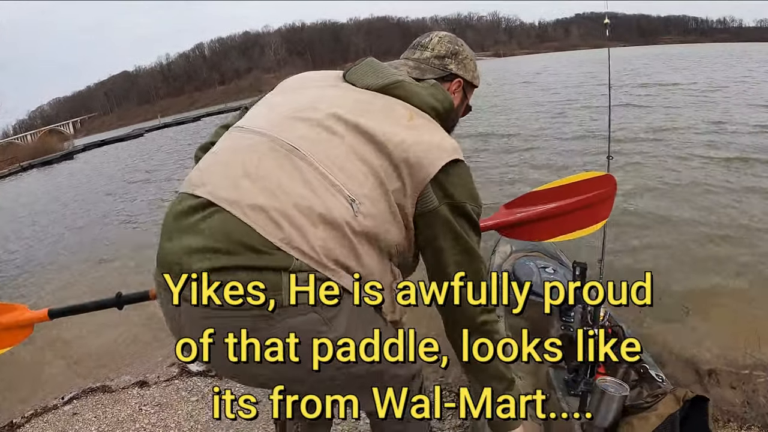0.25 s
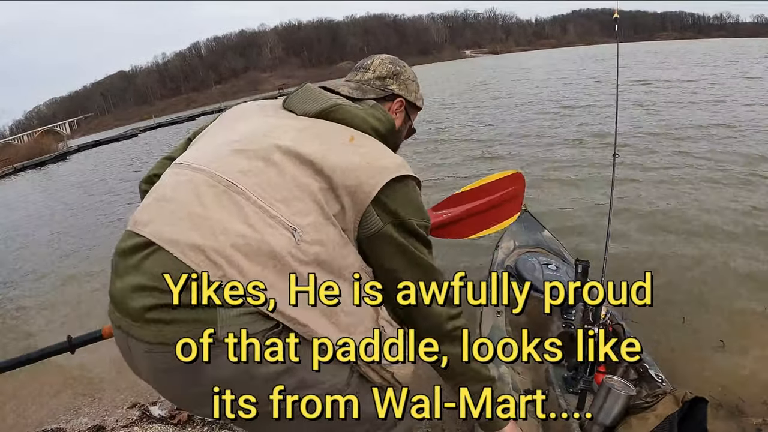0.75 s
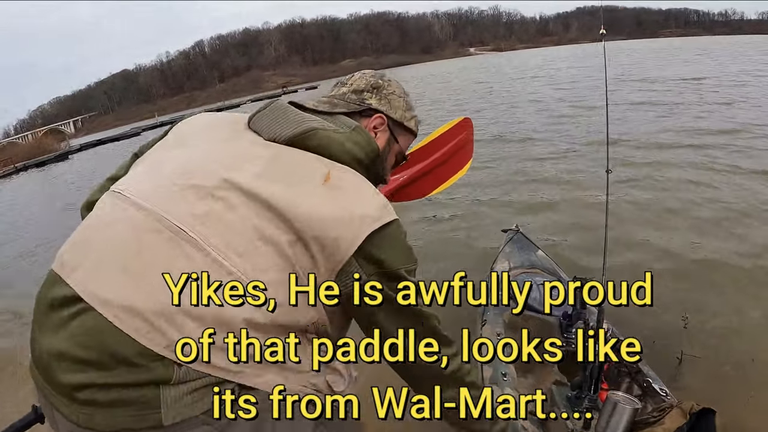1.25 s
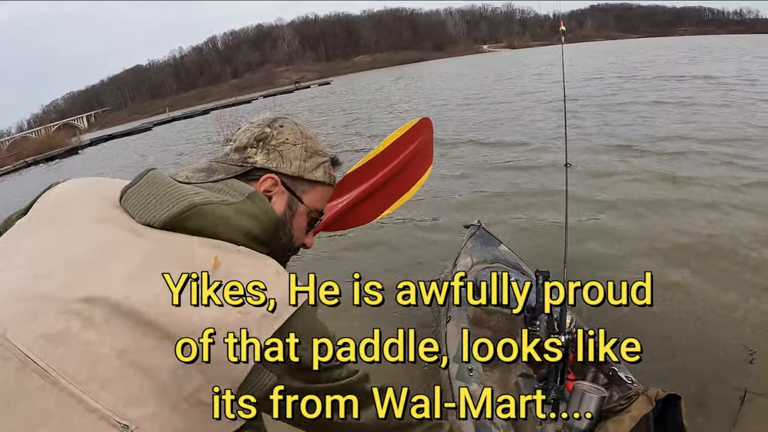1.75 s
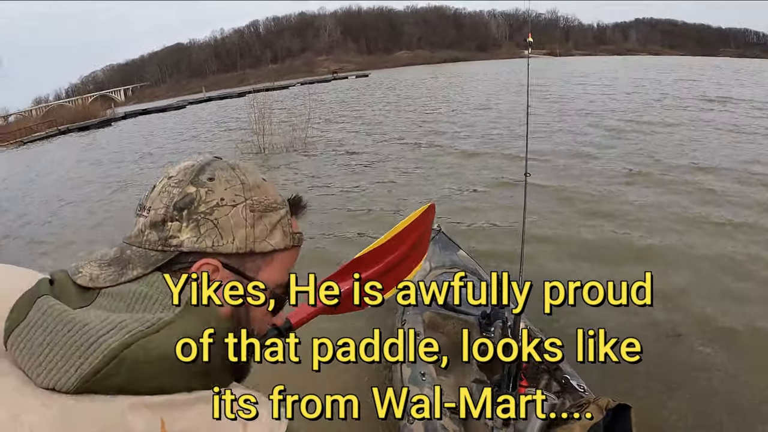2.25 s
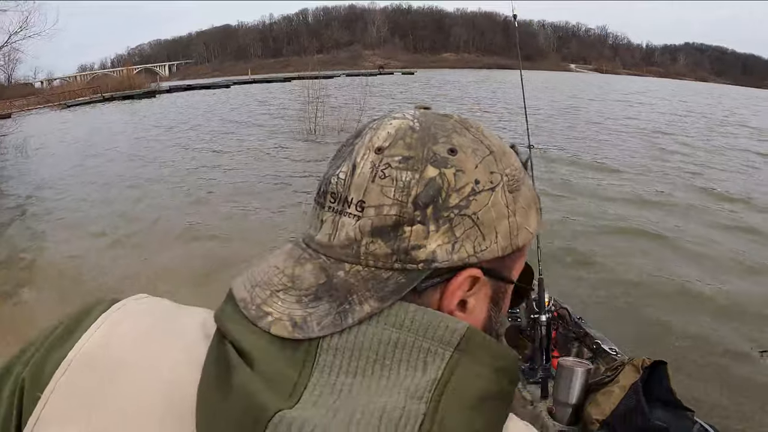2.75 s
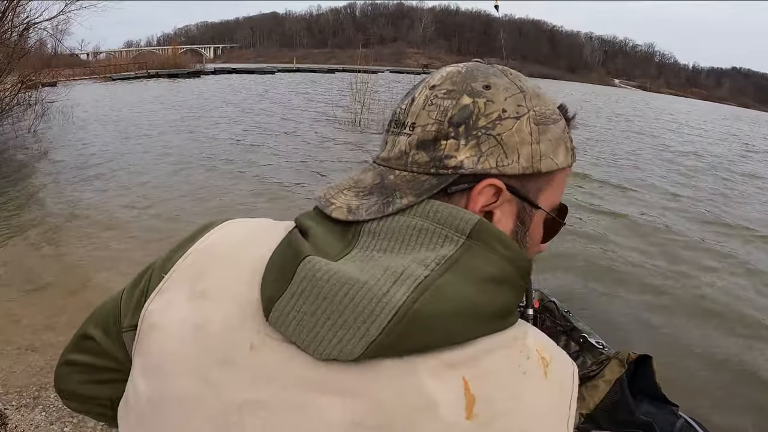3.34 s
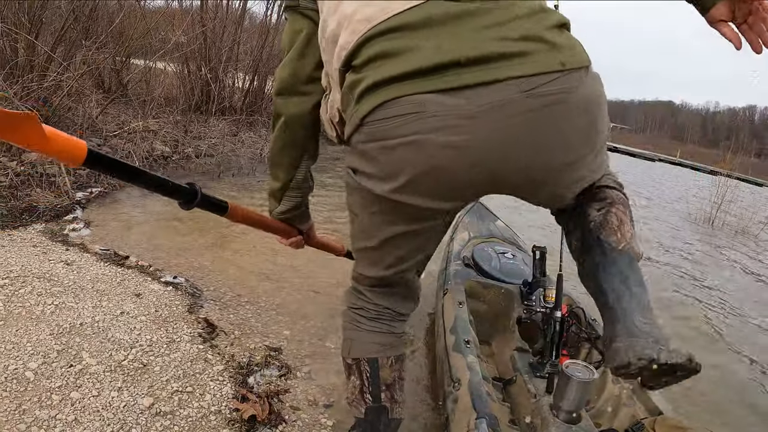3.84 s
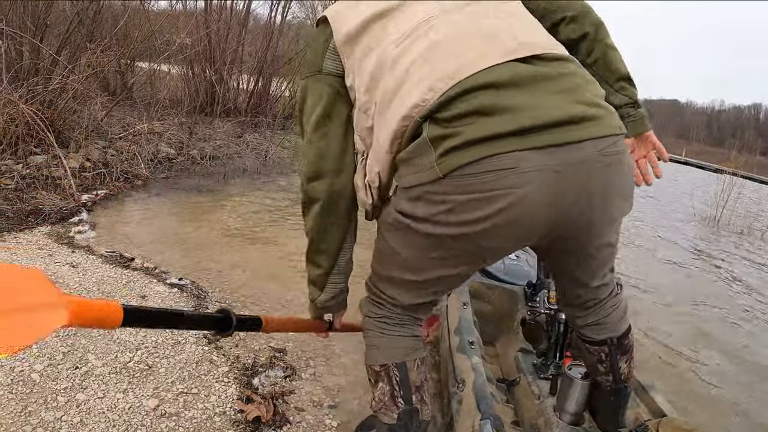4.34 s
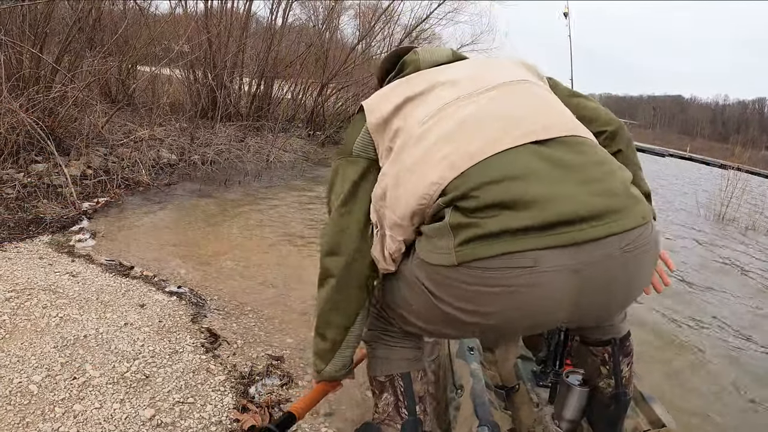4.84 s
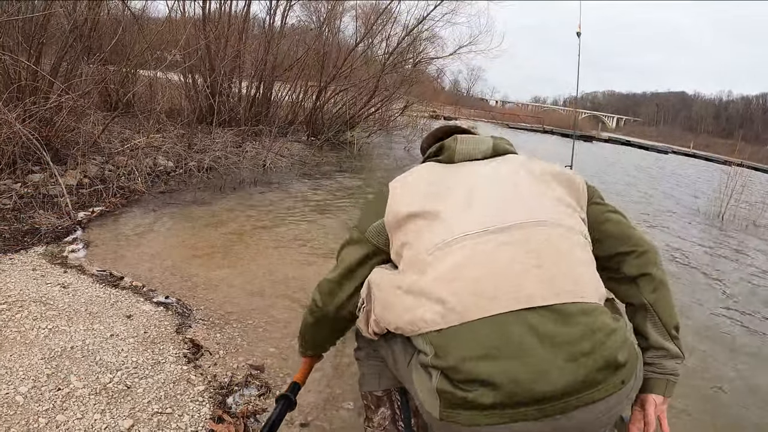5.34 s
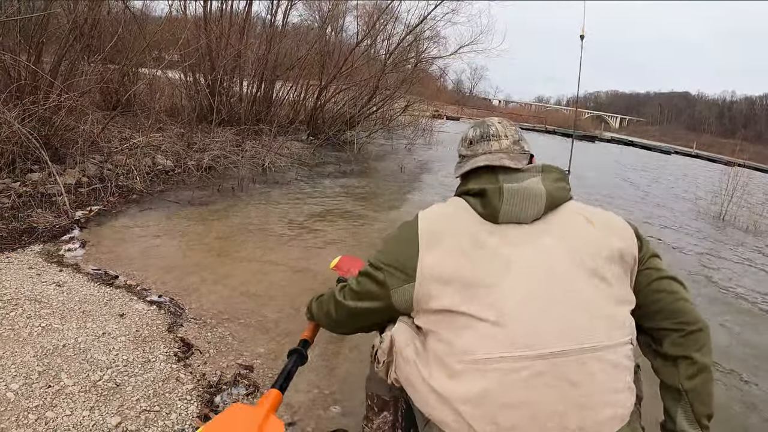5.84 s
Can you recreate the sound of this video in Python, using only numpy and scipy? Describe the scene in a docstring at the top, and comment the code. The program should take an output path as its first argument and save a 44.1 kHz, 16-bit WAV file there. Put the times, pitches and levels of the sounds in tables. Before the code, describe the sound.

At a quiet lakeshore, heard close up, a hollow plastic kayak is shoved over gravel in booming, scratchy lurches that weaken as it floats, with loose gear ticking. The level cuts out for an instant, then boots slosh and plop in shallow water, hull and deck are knocked, and the boat hisses away over wet sand. Light wind and a faint far engine sit underneath.

```python
"""On a lake shore, a plastic kayak grinds over gravel into the water: random stone hits shake its hollow,
booming hull, scratch and crackle, while loose gear clicks as short rings. The level drops out briefly.
Then boots slosh (filtered noise and ringing bubbles) and hull and deck are knocked (fading tones) as the
paddler boards, and the boat slides off over hissing wet sand. Light wind is low noise that swells in gusts;
from the wading on, a far engine hums as a wavering tone with two overtones."""
import sys
import numpy as np
from scipy import signal
from scipy.fft import rfft, irfft, next_fast_len
from scipy.io import wavfile
from scipy.ndimage import map_coordinates

SR = 44100
rng = np.random.default_rng(int(sys.argv[2]) if len(sys.argv) > 2 else 0)


def wav_out(sig):
    """Save sig, one row per channel (or a flat mono array), as 16-bit PCM at SR to the path in sys.argv[1]."""
    wavfile.write(sys.argv[1], SR, np.round(np.clip(np.atleast_2d(sig).T, -1, 1) * 32767).astype(np.int16))


N = 268657  # length of the scene in samples

# All levels are relative. A t60 is the time a ring takes to fade by 60 dB.
# A half length is the time from the peak of a swell until it has fallen to about a third.

# Steady grinding of the hull on gravel, easing as the boat floats: (time [s], level [dB])
DRAG_LEVEL = [(0.0, -28.5), (0.45, -32.5), (1.12, -30.8), (1.17, -33.5), (1.32, -37), (1.44, -36.5),
              (1.68, -27), (1.92, -32.5), (2.13, -35), (2.24, -41), (2.52, -44.5), (2.8, -45),
              (3.15, -47.5), (3.42, -60)]
# Lurches forward over the stones: (peak time [s], grinding level [dB], boom level [dB], half length [s])
LURCHES = [(0.005, -21.5, -13.5, 0.019), (0.167, -29.5, -26.5, 0.085), (0.278, -30.5, -21, 0.052),
           (0.382, -31.5, -24, 0.025), (0.526, -27.5, -22.5, 0.04), (0.765, -35, -27, 0.095),
           (0.967, -50, -28, 0.032), (1.377, -32.5, -30, 0.021), (1.574, -25.5, -33, 0.12),
           (2.046, -37, -25, 0.035), (2.324, -41.5, -33.5, 0.058), (2.618, -39.5, -31, 0.08),
           (2.758, -34, -30, 0.063), (3.216, -44, -34, 0.087)]
# Tone of stones heard through the shell: (frequency [Hz], level [dB])
SHELL_TONE = [(60, -30), (120, 3), (215, 1), (290, -4), (420, -2), (540, -6), (610, -4.5), (800, -10.5),
              (1100, -13.5), (1400, -16), (2000, -27), (4000, -52), (15500, -83)]
# Air and panel resonances, hull on the stones: (frequency [Hz], width [Hz], level [dB])
HULL_ON_STONES = [(84.4, 20, 2), (136.7, 35.6, 4), (161, 31, -3.5), (210.3, 41, -2)]
# The same with the bow in the water: (frequency [Hz], width [Hz], level [dB])
HULL_AFLOAT = [(113, 11.8, 4), (173, 47, -6.5), (211, 28, -8)]
# Tone of stone edges scratching the plastic: (frequency [Hz], level [dB])
SCRATCH_TONE = [(300, -22), (900, -8.5), (1230, 6), (1520, 2.5), (1670, 7.5), (1900, 2), (3000, -6.5),
                (4200, -15.5), (6000, -34), (9000, -31), (15500, -59)]
# Tone of stones heard directly: (frequency [Hz], level [dB])
GRIT_TONE = [(800, -7), (2500, 6.5), (4000, 3.5), (6000, 0.5), (7800, -2), (9200, -11), (11000, -18.5),
             (13000, -17), (15500, -37.5)]
# Light wind: (frequency [Hz], level [dB])
WIND_TONE = [(12, -8.5), (28, 0.5), (55, 2.5), (100, -5), (200, -13.5), (500, -35.5), (2000, -67.5),
             (12000, -80)]
# Gusts: (peak time [s], level [dB])
GUSTS = [(0.12, -51), (0.78, -49), (1.42, -41), (2.0, -42), (3.221, -35.5), (4.38, -27.5), (4.62, -30.5),
         (5.42, -30.5), (5.88, -33)]
# Single stones biting into the hull: (time [s], level [dB], length [s], scrape pitch [Hz])
SCUFFS = [(0.066, -43, .016, 7000), (0.191, -31, 0.064, 1680), (0.255, -20, .012, 1100),
          (0.267, -23, 0.038, 480), (0.524, -33, 0.021, 1240), (0.645, -31, .012, 700),
          (0.671, -36, 0.012, 2850), (0.75, -28, 0.028, 665), (0.892, -38, .02, 2570),
          (1.027, -34, 0.017, 680), (1.09, -23, 0.011, 960), (1.155, -34, 0.042, 695),
          (1.27, -35.5, 0.035, 680), (1.465, -26, 0.02, 505), (1.51, -23, 0.012, 600),
          (1.68, -27, 0.012, 560), (1.784, -28, .03, 665), (2.16, -34, 0.035, 1200),
          (2.417, -32, 0.025, 760), (2.438, -34, 0.013, 1300), (2.578, -26, 0.0069, 800),
          (2.603, -35, 0.005, 1080), (2.64, -32, .06, 240), (2.69, -28, 0.014, 560),
          (2.79, -33.5, 0.014, 916), (3.109, -40.5, 0.012, 1290)]
# Dull body of a scuff: (frequency [Hz], level [dB])
SCUFF_TONE = [(200, 2.0), (600, 12), (1700, -8.5), (3200, -13), (5000, -23.0), (8000, -35.0), (15500, -53.0)]
# Hard ticks of gear and pebbles: (time [s], level [dB], brightest pitch [Hz])
CLICKS = [(0.0696, -26.5, 11000), (0.196, -30, 5300), (0.229, -28.5, 4200), (0.268, -27.5, 5800),
          (0.677, -43, 3000), (0.892, -43, 3220), (1.115, -31, 4200), (1.2174, -34, 4500),
          (1.586, -31.5, 3600), (2.579, -23.5, 6020), (2.626, -34, 6200), (2.696, -33.5, 3400),
          (2.7844, -10, 5500), (3.012, -31, 4870), (3.1103, -24.5, 3600), (3.146, -38, 3800),
          (3.23, -34.5, 4300), (3.284, -31.5, 5000), (3.355, -39, 5500), (3.38, -39, 6950),
          (3.513, -30.5, 2600), (3.523, -28, 2520)]
# Ways the gear can ring: (average pitch [Hz], average level [dB], t60 [s])
GEAR_RINGS = [(3690, 0, 0.027), (4300, 5.5, 0.029), (4970, 2.5, .025), (5820, 2.5, 0.031),
              (6250, 3.5, 0.016), (6670, -5, .025), (9080, -4, 0.032), (9420, -7.5, 0.03),
              (11900, -3.5, .02)]
# Crack of a hard tick: (frequency [Hz], level [dB])
CLICK_CRACK_TONE = [(500, 15), (1800, 14.5), (2900, 2), (6000, 5), (9000, -2.5), (12500, -13.5),
                    (15500, -37)]
# Blows on the hull: (time [s], level [dB], panel pitch [Hz], t60 [s])
KNOCKS = [(0.228, -15, 97, 0.031), (0.258, -21, 500, .06), (0.264, -18, 99, 0.13), (0.293, -20, 330, 0.024),
          (0.75, -24.5, 157.5, 0.12), (1.506, -22, 637, 0.013), (2.033, -14.5, 342, 0.07),
          (2.577, -28, 426, 0.024), (2.692, -28.5, 404, 0.12), (3.215, -27, 440, 0.021),
          (4.343, -9, 200, 0.029), (4.377, -14.5, 148, 0.089), (4.394, -14.5, 100.7, 0.1),
          (4.607, -27, 98, 0.062), (5.334, -12.5, 315, 0.031), (5.907, -17.5, 84, 0.091)]
# Bursts of thrown water: (time [s], level [dB], brightest pitch [Hz])
SPLASHES = [(2.21, -42.5, 3570), (2.29, -44, 3400), (2.327, -38.5, 3300), (2.446, -46.5, 3700),
            (3.5766, -27.5, 6030), (3.659, -39, 2900), (3.7242, -35, 4580), (3.7827, -27, 3900),
            (3.884, -36, 4200), (3.918, -39, 3200), (3.981, -29, 4500), (3.988, -21.5, 6400),
            (4.005, -29.5, 5000), (4.007, -23.5, 2700), (4.0134, -34, 6000), (4.134, -29, 3500),
            (4.1464, -33, 3400), (4.1734, -28.5, 4300), (4.258, -33, 5500), (4.326, -32, 3200),
            (4.341, -28, 6500), (4.356, -19.5, 2300), (4.379, -20, 2300), (4.384, -22.5, 5900),
            (4.571, -35.5, 7000), (4.601, -38, 5000), (4.648, -25, 4700), (4.7934, -35.5, 7000),
            (5.425, -38, 6500), (5.19, -29, 7500), (5.235, -23, 6500), (5.2714, -27.5, 5500),
            (5.287, -28, 5800), (5.297, -22, 7060), (5.339, -29.5, 7000), (5.908, -25.5, 6550),
            (5.936, -28, 3000), (6.084, -20.5, 2840)]
# Tone shared by the splash bursts: (frequency [Hz], level [dB])
SPLASH_TONE = [(7500, 2), (9200, -12.0), (12500, -10.5), (15500, -30.5)]
# Tone of lapping water: (frequency [Hz], level [dB])
LAP_TONE = [(100, 6), (250, 5.5), (500, -1.5), (900, -14.5), (1700, -12.5), (2800, -26), (6000, -39),
            (15000, -69)]
# Tone of the fine fizz on the water: (frequency [Hz], level [dB])
FIZZ_TONE = [(1200, 8), (2500, 12), (4500, 10), (7500, 5), (8800, -2.5), (12300, -6.5), (14000, -42),
             (15500, -54)]
# Far engine: (time [s], level [dB])
ENGINE_LEVEL = [(3.5, -42), (3.85, -34), (4.45, -38), (4.85, -38.5), (5.45, -42), (5.8, -40), (6.09, -49)]
# Larger plops round boots and hull: (time [s], level [dB], cavity pitch [Hz], t60 [s])
PLOPS = [(3.565, -32, 447, 0.05), (3.990, -24, 630, 0.049), (4.023, -24, 503, 0.052),
         (4.077, -17.5, 310, 0.014), (4.243, -25, 424, 0.017), (4.327, -32.5, 830, 0.044),
         (4.343, -18, 737, 0.038), (4.356, -22.5, 540, 0.039), (4.382, -15, 447, 0.014),
         (4.549, -29.5, 526, .05), (4.563, -28, 550, 0.05), (4.586, -16.5, 428, 0.026),
         (4.651, -17, 427, 0.025), (5.144, -25, 750, .038), (5.174, -26.5, 486, 0.052),
         (5.186, -21, 300, 0.02), (5.327, -18, 405, 0.036), (5.348, -21, 200, 0.077)]
# Water churned up by a step: (peak time [s], level [dB], half length [s])
CHURNS = [(3.63, -61, 0.051), (3.762, -48.5, 0.071), (3.893, -49.5, 0.056), (4.11, -49, 0.023),
          (4.371, -36.5, 0.029), (4.567, -48.5, 0.069), (4.69, -50, .015), (4.924, -52, 0.13),
          (5.108, -43.5, 0.048), (5.275, -39, 0.056), (5.41, -43, 0.072)]
# Tone of the churned rush: (frequency [Hz], level [dB])
CHURN_TONE = [(200, -3), (700, 2.5), (2000, 1.5), (4000, -7), (15500, -41)]
# Bubbles chirping upward as they surface:
# (time [s], level [dB], starting pitch [Hz], t60 [s], rise [share of the pitch])
BLIPS = [(3.785, -38.5, 537, 0.12, .1), (3.850, -33, 1107, 0.091, 0.51), (4.079, -38, 3100, 0.016, .05),
         (4.247, -37.5, 980, 0.035, .9), (4.602, -33.5, 1630, 0.041, 0.34), (4.626, -44, 2200, 0.022, 0.33),
         (4.685, -38.5, 3300, 0.015, .1), (4.834, -36, 1450, 0.037, 0.16), (4.966, -35, 740, 0.086, 0.16),
         (5.087, -34, 1670, .03, 0.12), (5.167, -30.5, 1950, 0.012, .05), (5.254, -39, 4580, .02, .05),
         (5.283, -40, 2550, 0.012, .1), (5.298, -39, 2350, .014, .1), (5.380, -35, 1560, .04, 0.4)]
# Raps of paddle and gear on the deck: (time [s], level [dB], pitch [Hz], t60 [s], crack level [dB])
RAPS = [(4.013, -17.5, 916, 0.028, -15), (4.072, -23.5, 1010, 0.034, -24), (4.0872, -24.5, 860, 0.025, -39),
        (4.517, -30, 595, 0.017, -29), (4.530, -34, 620, 0.018, -31), (4.573, -38, 900, .015, -35),
        (4.6417, -21, 753, 0.025, -26), (4.664, -9.5, 1115, 0.01, -24), (4.672, -28, 1280, 0.028, -32),
        (4.790, -33.5, 620, 0.024, -34), (4.795, -38, 700, 0.018, -34), (5.103, -30, 1280, .02, -29.5),
        (5.221, -12.5, 1000, 0.025, -21.5), (5.233, -25.5, 920, 0.036, -30),
        (5.2695, -28.5, 1010, 0.027, -31)]
# Crack of a rap: (frequency [Hz], level [dB])
RAP_CRACK_TONE = [(250, 6.5), (1300, 3.5), (1950, -4), (2550, -0.5), (3250, -5), (3700, -15), (7000, -24),
                  (15500, -49.5)]
# Hull over wet sand: (time [s], level [dB])
SLIDE_LEVEL = [(5.67, -67), (5.72, -44.5), (5.76, -40), (5.83, -38.5), (5.9, -41), (5.97, -36.5),
               (6.09, -37.5)]
# Tone of the sand: (frequency [Hz], level [dB])
SAND_TONE = [(120, 5.5), (300, 4), (600, 1.5), (1300, -1.5), (2000, -3), (3200, -6.5), (4800, -12),
             (6000, -17), (7700, -19), (8600, -25.5), (12500, -32.5), (15500, -50.5)]
# Stereo spread of hull sounds: (frequency [Hz], side against middle [dB])
SHELL_WIDTH = [(100, -36), (600, -32.5), (1400, -20.5), (3000, -10), (8000, -7), (13000, 5.5)]
# Stereo spread of gear and water: (frequency [Hz], side against middle [dB])
OPEN_WIDTH = [(100, -6.5), (500, -17), (1200, -9.5), (2500, -7.5), (6000, -12), (11000, -12), (13000, -3)]
# Width of the stereo image: (time [s], side gain [dB])
IMAGE_WIDTH = [(1.0, -20), (1.6, -3.5), (2.9, 2), (3.3, 7), (3.5, 0.5)]
# Overall gain, with the brief dropout: (time [s], gain [dB])
DROPOUT_GAIN = [(3.39, 7), (3.435, -0.5), (3.439, -58.5), (3.462, -58), (3.468, -26), (3.51, -11.5),
                (3.54, -7.5), (3.72, -2)]

# How each voice of the hull follows the grinding: (level at USUAL_DB [dB], change [dB per dB])
USUAL_DB = -29
BOOM_LAW, SCRATCH_LAW, GRIT_LAW = (-34.5, 0.52), (-41, 0.91), (-59.5, 0.44)
WETTING_DB_PER_S = 2.5  # wetter stones scratch less
FLOATING_S = (2, 2.3)  # from, to: the water takes the weight
CATCH_DB, CATCH_PER_S = 0.4, 40  # clumps of sharp stones catch at random
BREEZE_DB, GUST_S = -42, 0.13  # steady wind; half length of a gust
SCUFF_FOCUS_DB, CLICK_FOCUS_DB, SPLASH_FOCUS_DB = 25, 6, 7  # fall per octave away from the given pitch
RATTLE_S, RATTLE_LOSS_DB = .022, 15.5  # each tick bounces once: how much later and weaker
WADING_S = (3.48, 5.74)  # from, to
CALM_LAP_DB, CALM_SPRAY_DB, TRICKLE_DB = -51.5, -58, -59  # the shallows between steps
WAKE_LAP_DB, WAKE_SPRAY_DB = -24, -31  # stirred water, beside the plop or splash itself
WAKE_RISE_S, WAKE_SETTLE_S = 0.043, 0.065  # how fast the water swells and calms
SLOP_DB, SLOP_PER_S = 1.1, 18  # the water slops unevenly
TOP_HZ = 15700  # nothing is kept from here up


def amp(db):
    """Turn decibels into a gain."""
    return 10 ** (np.asarray(db) / 20)


def unit(x):
    """Scale to an average strength (rms) of 1."""
    return x / np.sqrt(np.mean(x ** 2) + 1e-20)


def along(points, hz):
    """Read a curve of (frequency, value) points on a log frequency axis."""
    f, v = np.transpose(points)
    return np.interp(np.log(hz + 1), np.log(f + 1), v)


def levels(rows):
    """Give a gain per sample for each dB column, fading quickly outside the rows."""
    s, *columns = np.transpose(rows)
    t = np.arange(N) / SR
    outside = np.maximum(s[0] - t, 0) + np.maximum(t - s[-1], 0)
    return [amp(np.interp(t, s, column) - 300 * outside) for column in columns]


def wobble(rate):
    """Draw a smooth random curve through rate random points a second."""
    points = rng.standard_normal(int(N * rate / SR) + 4)
    return map_coordinates(points, [np.arange(N) * rate / SR])


def swell_at(s, length):
    """Rise and fall smoothly around time s."""
    return np.exp(-((np.arange(N) / SR - s) / length) ** 2)


def filtered(x, response):
    """Multiply the spectrum of x by a complex response."""
    m = next_fast_len(N + SR // 2)
    return irfft(rfft(x, m) * response(np.fft.rfftfreq(m, 1 / SR)), m)[..., :N]


def coloured(x, spectrum):
    """Give x a (frequency, level) tone with unit power gain, without any sound ahead of its cause."""
    m = 16384
    gain = unit(amp(along(spectrum, np.fft.rfftfreq(m, 1 / SR))))
    # folding the cepstrum forward makes the filter minimum-phase
    cepstrum = irfft(np.log(gain))
    cepstrum[1:m // 2] *= 2
    cepstrum[m // 2 + 1:] = 0
    impulse = irfft(np.exp(rfft(cepstrum)))
    return signal.fftconvolve(x, impulse)[:N]


def grains(rate, spread_db):
    """Scatter about rate tiny impacts a second, uneven in size, rms 1."""
    size = amp(spread_db * np.clip(rng.standard_normal(N), -2, 2))
    hits = rng.random(N) < rate / SR
    return unit(hits * size * np.sign(rng.standard_normal(N)))


def add(track, s, sound):
    """Mix a sound in at time s."""
    part = track[max(round(s * SR), 0):][:len(sound)]
    part += sound[:len(part)]


def ring(t, hz, t60, attack, glide=0):
    """Ring one fading tone whose pitch may climb as it dies."""
    life = t / max(t60, .002)
    tone = np.sin(2 * np.pi * hz * t * (1 + glide * np.minimum(life, 2) / 2))
    return tone * amp(-60 * life) * (1 - np.exp(-t / attack))


def ringlets(rate, centre_hz, octaves, cycles, spread_db, rise=0.19):
    """Make a cloud of tiny rings, rms 1: bubbles rise in pitch, stones do not."""
    t = np.arange(SR // 30) / SR
    when, pitch, size = rng.random((int(rate * N / SR), 3)).T[:, :, None]
    hz = np.minimum(centre_hz * 2 ** (octaves * (2 * pitch - 1)), SR / 3)
    # each ring fades by 60 dB over the given number of cycles
    life = t * hz / cycles
    tones = np.sin(2 * np.pi * hz * t * (1 + rise * np.minimum(life, 2)))
    tones = amp(spread_db * size ** 2 - 60 * life) * tones * (1 - np.exp(-t / 0.001))
    where = (when * N).astype(int) + np.arange(len(t))
    return unit(np.bincount(where.ravel(), tones.ravel(), N)[:N])


def hiss(size, bright_hz, focus_db):
    """Make a short noise, rms 1, strongest at bright_hz and falling by focus_db per octave."""
    octaves = np.abs(np.log2((np.fft.rfftfreq(size, 1 / SR) + 1) / bright_hz))
    return unit(irfft(rfft(rng.standard_normal(size)) * amp(-focus_db * octaves), size))


def follows(grind, law):
    """Give the gain of a voice that grows as a power of the grinding."""
    db, slope = law
    return amp(db) * (grind / amp(USUAL_DB)) ** slope


def lurching():
    """Give grinding and boom gains: the steady drag with a swell for every lurch, added as power."""
    steady, = levels(DRAG_LEVEL)
    grind_power = steady ** 2
    boom_power = follows(steady, BOOM_LAW) ** 2
    for s, grind_db, boom_db, length in LURCHES:
        swell = swell_at(s, length)
        grind_power = grind_power + (amp(grind_db) * swell) ** 2
        boom_power = boom_power + (amp(boom_db) * swell) ** 2
    return np.sqrt(grind_power), np.sqrt(boom_power)


def cavity(x, modes):
    """Let the hollow hull boom at its low resonances, weaker towards the treble, rms 1."""
    def response(f):
        total = 0
        for k, (centre, width, db) in enumerate(modes):
            resonance = 1j * f * width / (centre * centre - f * f + 1j * f * width)
            total = total + (-1) ** k * amp(db) * resonance
        return total / (1 + (f / 400) ** 2)
    return unit(filtered(x, response))


def shifting(x):
    """Add the echo of the hull's far side; its delay drifts as the contact point wanders along the hull."""
    delay_s, spread, shifts_per_s, strength = .0032, .25, 7, 0.44
    delay = delay_s * SR * np.exp(spread * wobble(shifts_per_s))
    echo = np.interp(np.arange(N) - delay, np.arange(N), x)
    return unit(x + strength * echo)


def drag():
    """Stones catch and slip under the hull: shell rasps, cavity booms, edges scratch and chatter, grit crackles."""
    t = np.arange(N) / SR
    grind, boom = lurching()
    scratch = follows(grind, SCRATCH_LAW) * amp(-WETTING_DB_PER_S * t)
    grit = follows(grind, GRIT_LAW)
    judder = amp(1.8 * wobble(55))
    stones = unit(grains(rate=1400, spread_db=2) * judder)
    # the cavity feels the whole bed of stones at once, so it is driven more evenly
    bed = grains(rate=6000, spread_db=2) + .5 * stones
    afloat = np.interp(t, FLOATING_S, [0, 1])
    booming = np.sqrt(1 - afloat) * cavity(bed, HULL_ON_STONES) + np.sqrt(afloat) * cavity(bed, HULL_AFLOAT)
    rasp = shifting(coloured(stones, SHELL_TONE))
    shell = boom * booming + amp(0.32) * grind * rasp
    edges = unit(0.41 * stones + grains(rate=1500, spread_db=3) * judder)
    scratching = shifting(coloured(edges, SCRATCH_TONE))
    # each stone's own brief ring
    chatter = amp(-8) * ringlets(rate=260, centre_hz=1301, octaves=1.3, cycles=64, spread_db=11, rise=0)
    crackle = coloured(unit(grains(rate=11000, spread_db=5.5) * judder), GRIT_TONE)
    catches = amp(CATCH_DB * wobble(CATCH_PER_S))
    return shell + catches * (scratch * (0.85 * scratching + chatter) + grit * crackle)


def wind():
    """Light wind rumbles and gusts as low noise, a little differently at each ear."""
    mid, side = (coloured(rng.standard_normal(N), WIND_TONE) for _ in range(2))
    power = amp(BREEZE_DB) ** 2 + sum((amp(db) * swell_at(s, GUST_S)) ** 2 for s, db in GUSTS)
    flutter = amp(2 * wobble(7))
    apart = amp(-14) * np.array([side, -side])
    return np.sqrt(power) * flutter * (mid + apart)


def scuffs():
    """A stone digs in suddenly, chatters along the plastic at its own pitch and lets go."""
    rasp, tones, t = np.zeros(N), np.zeros(N), np.arange(SR // 10) / SR
    for s, db, length, hz in SCUFFS:
        pressure = amp(db) * (1 - np.exp(-t / 0.0041)) * np.exp(-(t / length) ** 2)
        add(rasp, s, pressure)
        add(tones, s, pressure * hiss(len(t), hz, SCUFF_FOCUS_DB))
    body = coloured(rasp * grains(rate=2500, spread_db=5.0), SCUFF_TONE)
    return 0.32 * body + 0.54 * tones


def clicks():
    """Hard contacts crack and ring briefly, strongest near each tick's own pitch."""
    rings, cracks, t = np.zeros(N), np.zeros(N), np.arange(SR // 10) / SR
    bounces = [(s + RATTLE_S, db - RATTLE_LOSS_DB, hz) for s, db, hz in CLICKS]
    for s, db, bright_hz in CLICKS + bounces:
        # every tick meets another spot, which rings a little differently
        strength_db = rng.normal(0, 3, len(GEAR_RINGS))
        detune = rng.normal(1, .03, len(GEAR_RINGS))
        tone = np.zeros(len(t))
        for (hz, level, t60), luck, shift in zip(GEAR_RINGS, strength_db, detune):
            away = abs(np.log2(hz / bright_hz))
            gain = amp(level + luck - CLICK_FOCUS_DB * away)
            tone += gain * ring(t, hz * shift, t60, attack=0.00017)
        add(rings, s, amp(db - 14.0) * tone / np.abs(tone).max())
        crack = amp(db - 7.5 - 60 * t / 0.016) * (1 - np.exp(-t / 0.0012))
        add(cracks, s, crack * hiss(len(t), bright_hz, CLICK_FOCUS_DB))
    return rings + coloured(cracks, CLICK_CRACK_TONE)


def knocks():
    """Each blow flexes a plastic panel, which rings at two pitches with a dull rasp."""
    panels, contact, t = np.zeros(N), np.zeros(N), np.arange(SR // 4) / SR
    # soft plastic gives way before it rings
    flex = 1 - np.exp(-(t / .002) ** 2)
    for s, db, hz, t60 in KNOCKS:
        low = ring(t, hz, t60, attack=0.002)
        high = 0.26 * ring(t, hz * 1.6, t60 * 0.96, attack=0.00062)
        tone = flex * (low + high)
        add(panels, s, amp(db + 0.5) * tone / np.abs(tone).max())
        add(contact, s, amp(db - 14.5 - 60 * t / 0.12) * flex * rng.standard_normal(len(t)))
    return panels + coloured(contact, SHELL_TONE)


def wake(events, calm_db, wake_db):
    """Give the gain of water that swells towards each event and settles after it, over the calm of wading."""
    t = np.arange(N) / SR
    power = levels([(s, calm_db) for s in WADING_S])[0] ** 2
    for s, db, *_ in events:
        distance = np.maximum((s - t) / WAKE_RISE_S, (t - s) / WAKE_SETTLE_S)
        power = power + (amp(db + wake_db) * np.exp(-distance)) ** 2
    return np.sqrt(power)


def shallows():
    """Stirred water laps, bubbles and fizzes: dense tiny impacts mixed with small rising rings."""
    lap = wake(PLOPS, CALM_LAP_DB, WAKE_LAP_DB)
    spray = wake(SPLASHES, CALM_SPRAY_DB, WAKE_SPRAY_DB)
    lapping = 1.84 * coloured(grains(rate=4000, spread_db=5.0), LAP_TONE)
    lapping += 0.28 * ringlets(rate=180, centre_hz=1425, octaves=1.39, cycles=26, spread_db=3)
    fizz = 1.11 * coloured(grains(rate=2100, spread_db=4.0), FIZZ_TONE)
    fizz += 0.57 * ringlets(rate=74, centre_hz=4840, octaves=0.806, cycles=53, spread_db=7)
    slop = amp(SLOP_DB * wobble(SLOP_PER_S))
    return slop * (lap * lapping + spray * fizz)


def splashes():
    """Each splash throws a burst of spray with its own brightness, and drops that ping as they land."""
    spray, bursts, t = np.zeros(N), np.zeros(N), np.arange(SR // 8) / SR
    # the surface parts just before each burst
    lead = .008
    age = np.abs(t - lead)
    shape = (amp(-60 * age / 0.0093) + 0.13 * amp(-60 * age / 0.1)) * np.minimum(t / lead, 1)
    for s, db, bright_hz in SPLASHES:
        add(spray, s + 0.001188 - lead, amp(db - 12) * shape * hiss(len(t), bright_hz, SPLASH_FOCUS_DB))
        add(bursts, s + 0.0016 - lead, amp(db - 26.5) * shape)
    pings = bursts * ringlets(rate=610, centre_hz=6700, octaves=0.386, cycles=49, spread_db=2)
    return coloured(spray, SPLASH_TONE) + pings


def trickle():
    """Small drops plink from boots and paddle all through the wading."""
    plinks = ringlets(rate=70, centre_hz=1900, octaves=1.4, cycles=26, spread_db=12)
    return levels([(s, TRICKLE_DB) for s in WADING_S])[0] * plinks


def engine():
    """A far engine hums at a wavering pitch with two overtones."""
    average_hz = 79.8
    drift = 1 + .012 * wobble(14)
    waver = amp(1.5 * wobble(12))
    phase = 2 * np.pi * np.cumsum(average_hz * drift) / SR
    hum = unit(np.sin(phase) + 0.17 * np.sin(2 * phase) + 0.19 * np.sin(3 * phase))
    return amp(1.0) * levels(ENGINE_LEVEL)[0] * hum * waver


def plops():
    """Trapped air rings briefly and rises in pitch, amid a slap and a gurgling trail of churned water."""
    cavities, slaps, trail = np.zeros(N), np.zeros(N), np.zeros(N)
    t = np.arange(SR // 5) / SR
    swell = 1 - np.exp(-t / .003)
    for s, db, hz, t60 in PLOPS:
        tone = ring(t, hz, t60, attack=.0014, glide=.18)
        tone += .28 * ring(t, hz * 1.45, t60 * .8, attack=.001)
        add(cavities, s, amp(db) * tone / np.abs(tone).max())
        add(slaps, s, amp(db - 4.0 - 60 * t / 0.078) * swell * rng.standard_normal(len(t)))
        add(trail, s, amp(db - 17.5 - 60 * t / 0.13) * swell)
    gurgle = ringlets(rate=410, centre_hz=703, octaves=0.93, cycles=14, spread_db=12)
    return cavities + coloured(slaps, LAP_TONE) + trail * gurgle


def churn():
    """Water stirred by steps gurgles with small bubbles and a soft rush."""
    gain = sum(amp(db) * swell_at(s, length) for s, db, length in CHURNS)
    gurgle = ringlets(rate=380, centre_hz=1550, octaves=1.0, cycles=19, spread_db=12)
    rush = coloured(grains(rate=900, spread_db=5.5), CHURN_TONE)
    return gain * (0.66 * gurgle + 0.56 * rush)


def blips():
    """Lone bubbles ring cleanly and climb in pitch."""
    out, t = np.zeros(N), np.arange(SR // 5) / SR
    for s, db, hz, t60, rise in BLIPS:
        tone = ring(t, hz, t60, attack=0.001, glide=rise)
        add(out, s, amp(db) * tone / np.abs(tone).max())
    return out


def raps():
    """Something hard strikes the deck: a bright crack and a short hollow ring."""
    rings, cracks, t = np.zeros(N), np.zeros(N), np.arange(SR // 10) / SR
    for s, db, hz, t60, crack_db in RAPS:
        tone = ring(t, hz, t60, attack=0.0011)
        tone += 0.39 * ring(t, hz * 1.325, t60 * 0.86, attack=0.0017)
        add(rings, s, amp(db) * tone / np.abs(tone).max())
        crack = amp(crack_db - 60 * t / 0.025) * (1 - np.exp(-t / 0.00049))
        add(cracks, s, crack * rng.standard_normal(len(t)))
    return rings + coloured(cracks, RAP_CRACK_TONE)


def slide():
    """Fine wet sand hisses under the departing hull, with a little froth."""
    sand = coloured(grains(rate=4000, spread_db=3.0), SAND_TONE)
    froth = 0.28 * ringlets(rate=230, centre_hz=1913, octaves=1.3, cycles=27, spread_db=17)
    clumps = amp(1.3 * wobble(60))
    return levels(SLIDE_LEVEL)[0] * unit(clumps) * (sand + froth)


def placed(x, width, lag_samples):
    """Place a sound between two close ears: a tiny delay, and sound scattered off boat and paddler."""
    t = np.arange(SR // 30) / SR
    scatter = rng.standard_normal(len(t)) * amp(-60 * t / .04) * (1 - np.exp(-t / .002))
    scattered = signal.fftconvolve(x, scatter / np.linalg.norm(scatter))[:N]
    side = filtered(scattered, lambda hz: amp(along(width, hz)))
    ears = np.array([[1], [-1]])  # left, right
    # each ear gets half the lag, in opposite directions
    direct = filtered(x, lambda hz: np.exp(-1j * np.pi * ears * lag_samples * hz / SR))
    return direct + ears * side


def scene():
    """Set the boat in the middle, its gear a little left and the stirred water a little right."""
    boat = placed(drag() + scuffs() + knocks(), SHELL_WIDTH, lag_samples=0)
    gear = placed(clicks(), OPEN_WIDTH, lag_samples=-0.57) * amp([[1], [-1]])
    water = shallows() + splashes() + trickle() + plops() + churn() + blips()
    boarding = placed(water + raps() + slide(), OPEN_WIDTH, lag_samples=0.19) * amp([[-.3], [.3]])
    return boat + gear + boarding + wind() + engine()


def record(dry):
    """Open the stereo image from nearly mono, drop the level briefly and cut the top of the treble."""
    def gain(rows):
        return amp(np.interp(np.arange(N) / SR, *np.transpose(rows)))
    mid = dry.mean(axis=0)
    widened = mid + gain(IMAGE_WIDTH) * (dry - mid)
    return filtered(widened * gain(DROPOUT_GAIN), lambda hz: hz < TOP_HZ)


dry = scene()
out = record(dry)
wav_out(out)
```